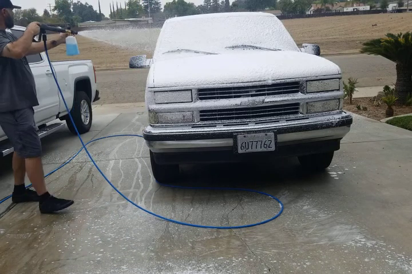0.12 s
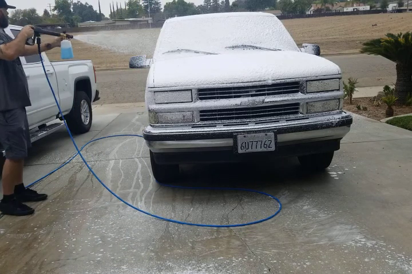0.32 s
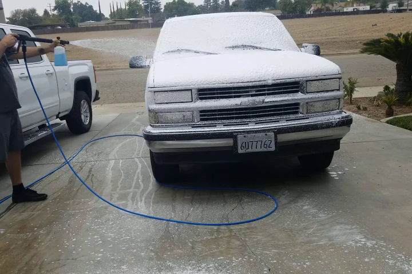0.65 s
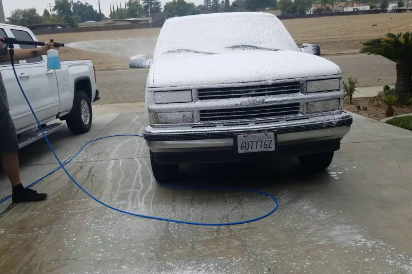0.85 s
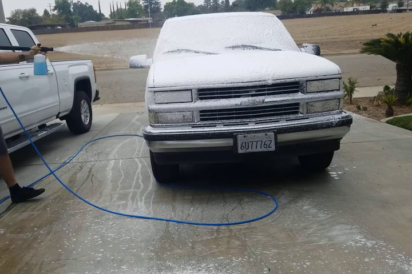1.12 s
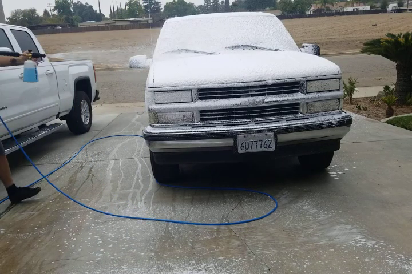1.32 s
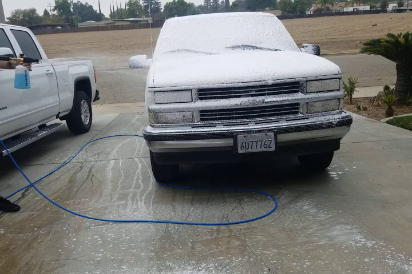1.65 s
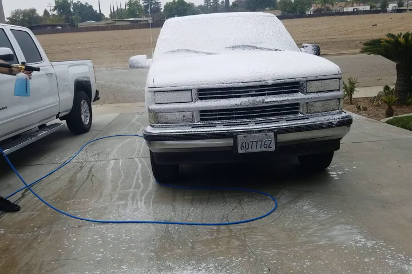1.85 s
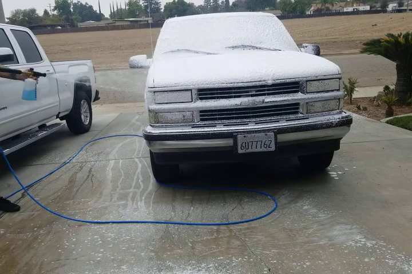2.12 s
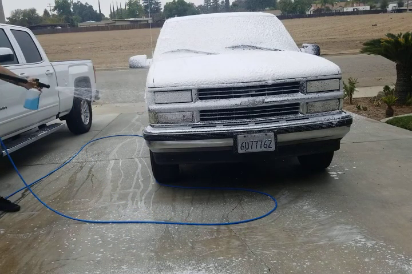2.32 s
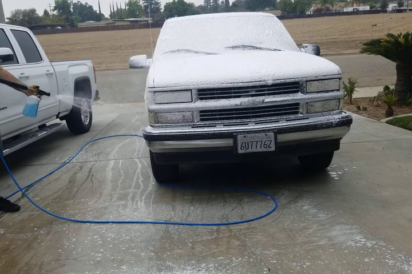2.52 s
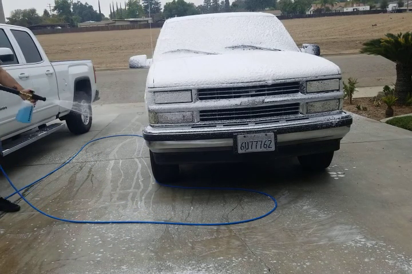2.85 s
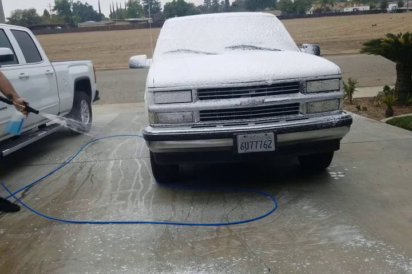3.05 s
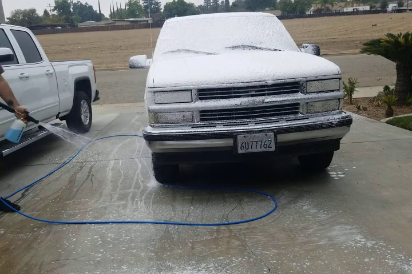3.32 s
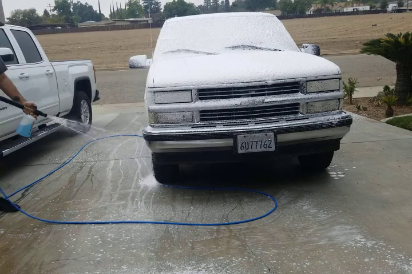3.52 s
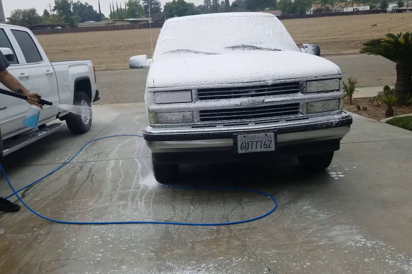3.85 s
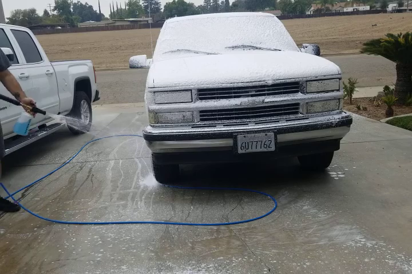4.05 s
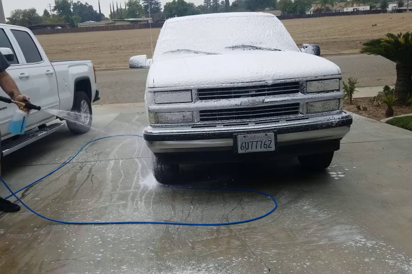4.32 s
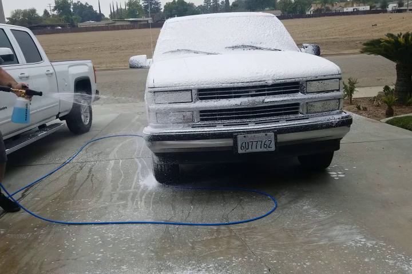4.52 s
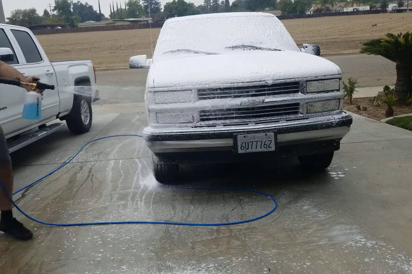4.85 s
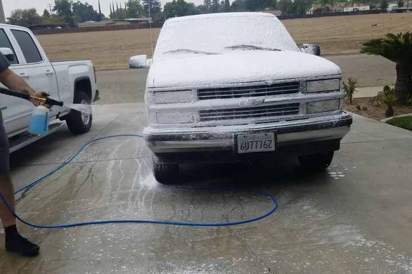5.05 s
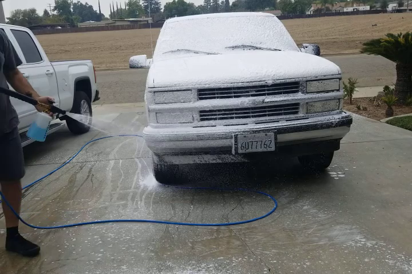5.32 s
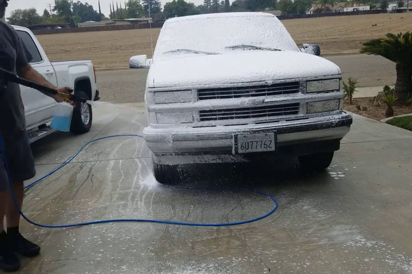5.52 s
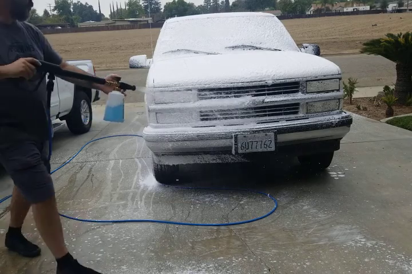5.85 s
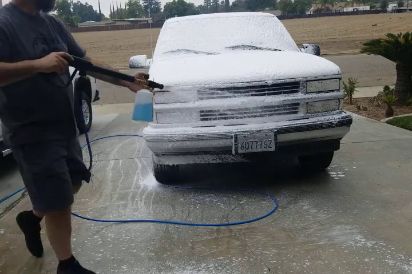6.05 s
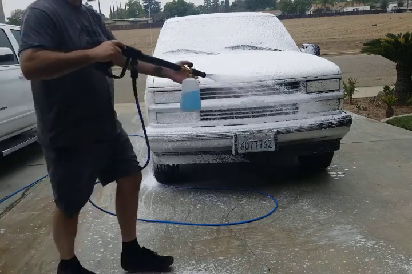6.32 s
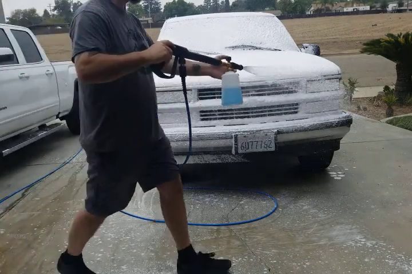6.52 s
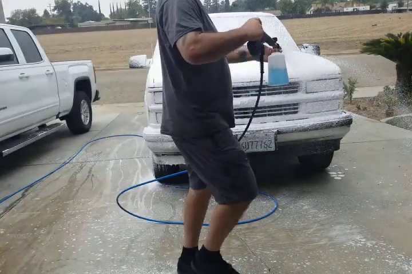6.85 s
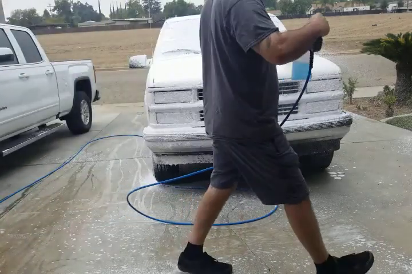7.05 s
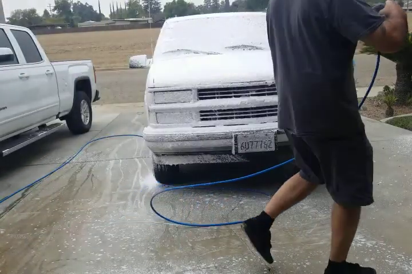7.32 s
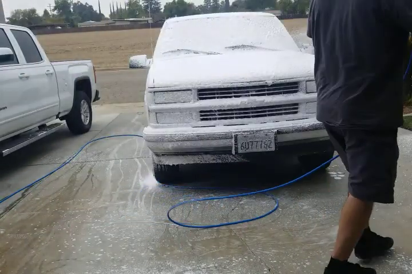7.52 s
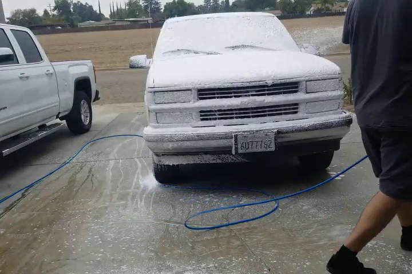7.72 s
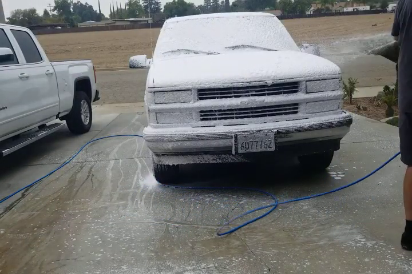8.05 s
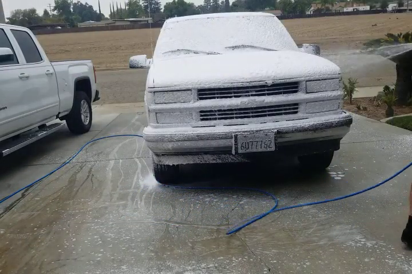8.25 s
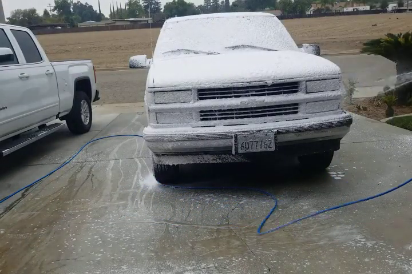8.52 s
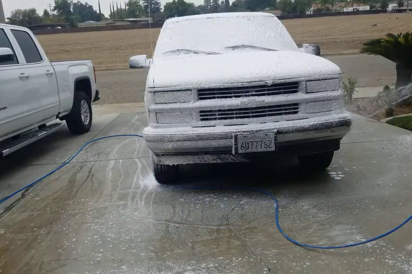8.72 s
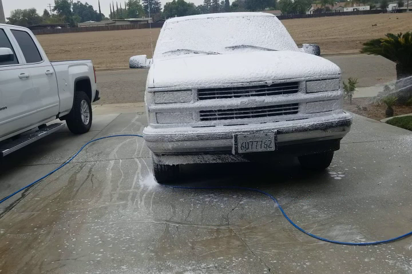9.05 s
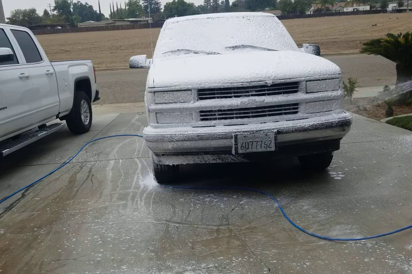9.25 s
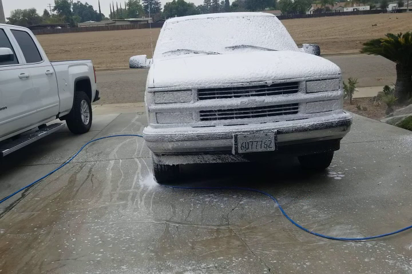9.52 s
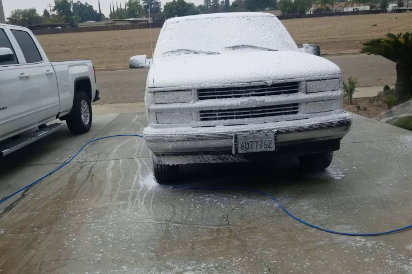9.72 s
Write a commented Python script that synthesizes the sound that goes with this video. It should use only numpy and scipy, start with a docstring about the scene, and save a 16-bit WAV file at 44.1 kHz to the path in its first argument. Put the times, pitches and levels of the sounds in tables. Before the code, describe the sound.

Constant mechanical drone of a small electric pump outdoors, with a low hum, rough buzz and high whine. Over it, a breathy, slightly fluttering rasp of air and water accompanies bright sprays that rush up and fall away as someone foams a truck. A brief dull panel thud comes midway, then more swishes and a sharp bright burst late on. The microphone stands still on the driveway, with an identical, centred sound on both sides.

```python
"""On a driveway an electric pressure washer hums: its motor turns a piston pump through a whining gear pair.
The machine is a sum of tones locked to the pump shaft, with coloured noise for its air and bearings.
A foam cannon rasps, as filtered noise with warbling tones and an echo, while it draws air.
Its fan of spray, noise mixed with tiny impacts, hisses as it sweeps over a truck and the concrete.
Hollow panels boom briefly and faint low drones glide behind; both channels carry the same sound."""
import sys
import numpy as np
from scipy import signal
from scipy.fft import rfft, irfft, next_fast_len
from scipy.io import wavfile
from scipy.ndimage import uniform_filter1d, map_coordinates

SR = 44100
rng = np.random.default_rng(int(sys.argv[2]) if len(sys.argv) > 2 else 0)


def waveform_to_disk(signal):
    """Save audio, clipped to [-1, 1], as 16-bit WAV at the path in sys.argv[1]."""
    frames = np.transpose(np.atleast_2d(signal))
    scaled = np.clip(frames, -1, 1) * 32767
    samples = np.round(scaled).astype(np.int16)
    wavfile.write(sys.argv[1], SR, samples)


N = 435708  # length [samples]


def amp(db):
    """Level to amplitude: 20 dB is a factor of ten."""
    return 10 ** (np.asarray(db) / 20)


def unit(x):
    """Normalisation by the root mean square, to rms 1."""
    return x / np.sqrt(np.mean(x ** 2) + 1e-20)


def curves(rows):
    """Linear interpolation in time: one value per sample for each column after the time."""
    times, *columns = np.transpose(rows)
    return [np.interp(np.arange(N) / SR, times, column) for column in columns]


def wobble(rate):
    """Slow random modulation: a spline through `rate` normal random knots a second."""
    count = int(N * rate / SR) + 4
    fine_knots = np.arange(8 * count - 8) / 8  # eight spline points per knot
    smooth = map_coordinates(rng.standard_normal(count), [fine_knots])
    return np.interp(np.arange(N) * (8 * rate / SR), np.arange(len(smooth)), smooth)


def filtered(x, response):
    """Linear filtering: the spectrum is multiplied by a response of frequency, without phase shift."""
    m = next_fast_len(N + 8192)  # padding keeps the end from wrapping to the start
    return irfft(rfft(x, m) * response(np.fft.rfftfreq(m, 1 / SR)), m)[:N]


def coloured(x, spectrum):
    """Spectral shaping: (frequency [Hz], level [dB]) points joined on a log-frequency axis, at rms 1."""
    f, db = np.transpose(spectrum)

    def response(hz):
        return amp(np.interp(np.log(hz + 1), np.log(f), db))
    return unit(filtered(x, response))


def patchy_noise(patchy_db):
    """Non-stationary noise: white noise with smooth random gain over time and frequency, at rms 1."""
    z = signal.stft(rng.standard_normal(N), nperseg=512)[2]
    field = uniform_filter1d(rng.standard_normal(z.shape), size=3, axis=0)  # smoothed over frequency
    field = uniform_filter1d(field, size=12, axis=1)  # smoothed over time
    patches = z * amp(patchy_db * unit(field))
    return unit(signal.istft(patches, nperseg=512)[1][:N])


def droplets(rate, spread_db):
    """Shot noise: impulses of uneven size at random moments, `rate` a second on average, at rms 1."""
    sizes = rng.uniform(-0.63, 1, N) * amp(spread_db * np.clip(rng.standard_normal(N), -2, 2))
    return unit(sizes * (rng.random(N) < rate / SR))


def tone(angle):
    """Pure tone: a sine of rms 1 that follows an angle [rad] from a random starting phase."""
    turns = angle / (2 * np.pi) + rng.random()
    cycle = (turns - np.floor(turns)).astype(np.float32)
    return np.sqrt(2) * np.sin(2 * np.pi * cycle)


# faint low drones: (start [s], end [s], start frequency [Hz], end frequency [Hz], level at mid-swell [dB])
DRONE_GLIDES = [(.5, 1.8, 138.6, 140.5, -53.5), (2.4, 3.8, 54.4, 61.2, -61), (3.5, 4.5, 62.3, 71, -54),
                (4.5, 5.4, 73.3, 84, -52.5), (5.5, 6.4, 87.4, 94, -55), (6.3, 10, 92.1, 98, -56)]


def drone():
    """Frequency glide: faint, unsteady drones swell and fade, perhaps a distant vehicle changing speed."""
    t, out = np.arange(N) / SR, np.zeros(N)
    for start, end, from_hz, to_hz, db in DRONE_GLIDES:
        part = np.clip((t - start) / (end - start), 0, 1)
        hz = from_hz + (to_hz - from_hz) * part
        angle = 2 * np.pi * np.cumsum(hz) / SR + 0.58 * wobble(12)
        swell = np.sin(np.pi * part)
        out += amp(db + 1.8 * wobble(9.2)) * swell * tone(angle)
    return out


# cooling air and housing noise: (frequency [Hz], relative density [dB per Hz])
HOUSING_AIR = [(25, -30), (45, -23), (95, -1), (140, -4.5), (320, -1.5), (520, 2), (780, 2), (1000, -2.5),
               (1700, -3), (3500, -6), (4600, -11), (6600, -27.5), (15700, -12.5)]
# hiss of teeth and bearings, ringing in the gear case: (frequency [Hz], relative density [dB per Hz])
GEAR_CASE_HISS = [(3000, -7), (4600, -29), (5400, -5.5), (6500, -22), (7300, -5.5), (9300, -15.5),
                  (10400, -9), (11300, -13), (12300, -6), (13200, 1), (14300, -6), (15500, -6.5)]


def fan(shaft, pump_db):
    """Amplitude modulation: housing air and gear hiss throb with the pump; the air is screened a little."""
    throb = 1 + .08 * np.cos(shaft) + .03 * np.cos(2 * shaft)
    air = coloured(patchy_noise(patchy_db=1.4), HOUSING_AIR)
    air = amp(-26.5 + 0.28 * pump_db + 0.17 * wobble(3.26)) * air
    teeth = coloured(patchy_noise(patchy_db=0.7), GEAR_CASE_HISS)
    teeth = amp(-37.5) * (1 + 0.081 * np.cos(shaft)) * teeth
    return throb * (air + teeth)


PINION_TEETH, WHEEL_TEETH = 11, 50
# motor partials: (multiple of the motor shaft, relative level [dB])
MOTOR_PARTIALS = [(1, 0), (2, -20), (3, -18), (4, -22), (5, -16)]
# side tones of the hum: (offset [pump turns a second], relative level [dB])
LOAD_SIDES = [(-1, -9), (1, -14.5), (2, -21.5), (5, -15), (7, -14.5), (8, -20), (10, -18)]


def motor(shaft, level_db):
    """Forced vibration: the rotor shakes the housing and the pump's load swings it, over a mains hum."""
    rotor = shaft * WHEEL_TEETH / PINION_TEETH
    hum = sum(amp(db) * tone(k * rotor) for k, db in MOTOR_PARTIALS)
    sides = sum(amp(db) * tone(rotor + k * shaft) for k, db in LOAD_SIDES)
    mains = tone(2 * np.pi * 120 * np.arange(N) / SR)  # 120 Hz
    return amp(level_db - 0.06) * (hum + sides) + amp(-63.5) * mains


# steady gear tones, before a 0.2 dB lift: (multiple of the tooth rate, level [dB])
MESH_TONES = [(1, -46), (4, -53), (5, -50), (6, -50)]
# two strong gear tones that swell and fade, before the same lift:
# (time [s], 2nd multiple of the tooth rate [dB], 3rd multiple [dB])
STRONG_MESH = [(0.0, -47, -50), (0.22, -51, -46.5), (0.91, -47, -51), (1.21, -52, -50), (2.34, -46.5, -46),
               (2.5, -45, -52), (3.08, -50, -46), (3.27, -47.5, -54), (3.6, -50, -45), (3.8, -44, -51),
               (4.54, -46, -48), (4.9, -47.5, -57), (8.45, -47.5, -52), (8.61, -51, -49), (9.03, -49, -58),
               (9.88, -42.5, -54)]
# side tones of each gear tone: (offset [pump turns a second], level relative to the gear tone [dB])
MESH_SIDES = [(-8, -14.5), (-1, -4.5), (1, -10), (8, -15)]


def gears(shaft):
    """Gear meshing: teeth whine at the tooth rate; the uneven wheel adds drifting side tones."""
    whine = np.zeros(N)
    jitter = 0.082 * wobble(110) + 0.099 * wobble(5.5)  # [rad], multiplied by the order of each tone
    second_db, third_db = curves(STRONG_MESH)
    for k, db in MESH_TONES + [(2, second_db), (3, third_db)]:
        mesh = k * (WHEEL_TEETH * shaft + jitter)
        sides = np.zeros(N)
        for turns, side_db in MESH_SIDES:
            side = tone(mesh + turns * shaft + .5 * wobble(4.6))
            sides += amp(side_db + 2.4 * wobble(4)) * side
        whine += amp(db + 0.2 + 0.55 * wobble(6)) * (tone(mesh) + sides)
    # the side tone just above the tooth rate stands out
    upper_side = tone((WHEEL_TEETH + 1) * shaft + jitter)
    return whine + amp(-48 + 2 * wobble(3)) * upper_side


LOUDEST_ORDER = 19  # multiple of the pump shaft
# piston stroke partials: (multiple of the pump shaft, relative level [dB])
STROKE_PARTIALS = [(1, -18), (2, -11), (3, -10), (4, -34), (5, -1), (6, -28), (7, -19), (8, -9.5), (9, -8),
                   (10, -4.5), (11, -5), (12, -7.5), (13, -15), (14, -13), (15, -3), (16, -7), (17, -9.5),
                   (18, -40.5), (19, 0), (20, -22), (21, -12.5), (22, -18), (23, -9.5), (24, -5.5),
                   (25, -24), (26, -3.5), (27, -14), (28, -15), (29, -10), (30, -12), (31, -11.5),
                   (32, -15), (33, -6.5), (34, -13.5), (35, -6.5), (36, -19)]


def pump(shaft, level_db):
    """Harmonic series: the piston strokes repeat with every turn, and each partial wavers by itself."""
    body = np.zeros(N)
    for k, db in STROKE_PARTIALS:
        if k != LOUDEST_ORDER:
            partial = tone(k * shaft + 0.052 * wobble(14))
            body += amp(db + 1.46 * wobble(2.99)) * partial
    loudest = amp(level_db + 0.2 + 0.35 * wobble(11)) * tone(LOUDEST_ORDER * shaft)
    # the many weaker partials are screened only half as much as the loudest one
    return amp(-24.5 + .5 * level_db) * body + loudest


# air drawn through the foam cannon: (frequency [Hz], relative density [dB per Hz])
INLET_AIR = [(1200, -21), (1700, -18.5), (1950, -2), (2150, 1.5), (2450, 0), (2750, -2), (2950, -2),
             (3200, -19), (4200, -35)]
# unsteady whistles in the air inlet: (centre [Hz], wander scale [Hz], relative level [dB])
INLET_WHISTLES = [(2222, 150, -12.5), (2703, 200, -15)]
# the rasp, before a 0.4 dB cut: (time [s], level [dB])
RASP_LEVEL = [(0.0, -37), (0.6, -37), (1.21, -34), (5.47, -34), (5.58, -31.5), (6.88, -33.5), (8.03, -38.5),
              (8.61, -34), (9.24, -35.5), (9.35, -40.5), (9.6, -34), (9.88, -35.5)]
ECHO_MS, SWAY_MS, SWAYS_PER_S = 2.265, 0.067, 2.5  # echo delay, scale of its shift, random knots a second


def nozzle(shaft):
    """Comb filtering: the rasp of gulped air meets its echo off the concrete, which shifts as the gun sways."""
    rasp = coloured(patchy_noise(patchy_db=1.77), INLET_AIR)
    for centre_hz, wander_hz, db in INLET_WHISTLES:
        angle = 2 * np.pi * np.cumsum(centre_hz + wander_hz * wobble(90)) / SR
        rasp = rasp + amp(db) * wobble(120) * tone(angle)
    delay = (ECHO_MS + SWAY_MS * wobble(SWAYS_PER_S)) * SR / 1000  # [samples]
    echo = np.interp(np.arange(N) - delay, np.arange(N), rasp)
    sputter = amp(0.27 * wobble(35)) * (1 + 0.021 * np.cos(shaft))
    return amp(curves(RASP_LEVEL)[0] - 0.4) * unit((rasp + 0.15 * echo) * sputter)


# the jet drums on hollow panels:
# (time of peak [s], Gaussian half length [s], resonance [Hz], peak level [dB])
PANEL_BOOMS = [(4.39, 0.028, 283, -39.5), (4.44, .03, 415, -44), (4.458, 0.032, 139, -49)]


def panel():
    """Resonance: noise in a narrow band booms, swelling and fading as the jet crosses a hollow panel."""
    t, out = np.arange(N) / SR, np.zeros(N)
    for s, half_s, ring_hz, db in PANEL_BOOMS:
        noise = rng.standard_normal(N)
        boom = unit(filtered(noise, lambda hz: 1 / (1 + ((hz - ring_hz) / 35) ** 2)))
        out += amp(db) * np.exp(-.5 * ((t - s) / half_s) ** 2) * boom
    return out


# the fan of spray swings towards the listener and away again:
# (time of peak [s], hiss level [dB], splash level [dB], rise [s], fall [s],
#  flank shape [1 a pointed peak, 2 a round bell])
SPRAY_SWEEPS = [(.82, -33, -41, 0.048, .6, 1.6), (1.89, -24, -35.5, 0.22, .2, 1.17),
                (3.14, -24.5, -36.5, 0.32, 0.21, 1.06), (3.75, -34, -40.5, 0.96, 0.84, 1.7),
                (4.18, -27, -36.5, .06, .1, 1.4), (4.43, -18.5, -34, .13, 0.13, 1.6),
                (4.68, -26.5, -36, 0.19, 0.37, 1.2), (5.36, -19.5, -32.5, 0.17, 0.51, 1.18),
                (6.27, -27.5, -34, 0.22, 0.21, 1.1), (6.9, -24.3, -34.5, 0.16, .17, 1.5),
                (7.45, -36.5, -47.5, 0.58, 0.67, 1.3), (8.64, -18, -33, 0.15, 0.19, 1.6),
                (8.94, -29, -40, .07, .2, 1), (9.38, -35.5, -43.5, 0.23, 0.42, 1.3),
                (9.71, -27.5, -40, 0.058, .4, 1.3)]


def sweeps(peaks_db, away_db, wider):
    """Energy summation: the power of every sweep adds to that of the steady spray; gives a level in dB."""
    t = np.arange(N) / SR
    power = np.full(N, amp(away_db) ** 2)
    for (s, _, _, rise, fall, shape), db in zip(SPRAY_SWEEPS, peaks_db):
        off_aim = np.abs(t - s) / (wider * np.where(t < s, rise, fall))
        power += amp(db) ** 2 * np.exp(-2 * np.minimum(off_aim, 10) ** shape)
    return 10 * np.log10(power)


# the fan of spray: (frequency [Hz], relative density [dB per Hz])
MIST_HISS = [(3000, -30), (7000, -10), (7800, -22), (8500, -9.5), (9300, -0.5), (10500, 0), (11200, -4),
             (12000, 1), (13000, 2), (14200, -4.5), (15200, -4), (15700, -28)]
# foam landing on paint and concrete: (frequency [Hz], relative density [dB per Hz])
FOAM_SPLASH = [(200, -30), (600, -18), (1500, -6.5), (3300, 3.5), (4600, 1), (6000, 1), (7200, -2),
               (7700, -5), (9000, 1), (15000, -29)]
AWAY_HISS_DB, AWAY_SPLASH_DB = -45, -46.5  # the spray while it points away
SPLASH_WIDER = 1.54  # the splash swells and fades this many times more slowly than the hiss
# a louder sweep is brighter: treble edge, treble growth per dB, hiss level at which it is neutral
BRIGHT_HZ, BRIGHT_DB_PER_DB, BRIGHT_FROM_DB = 12500, 0.04, -37


def spray(shaft):
    """Turbulence and impact noise: mist hisses, droplets patter, both pulsing slightly with the pressure."""
    _, hiss_peaks, splash_peaks, *_ = np.transpose(SPRAY_SWEEPS)
    hiss_db = sweeps(hiss_peaks, AWAY_HISS_DB, wider=1)
    splash_db = sweeps(splash_peaks, AWAY_SPLASH_DB, wider=SPLASH_WIDER)
    pressure = 1 + 0.028 * np.cos(shaft) + 0.024 * np.cos(2 * shaft)
    jet = patchy_noise(patchy_db=1.0) + 0.42 * droplets(rate=3400, spread_db=5)
    mist = coloured(jet, MIST_HISS)
    treble = filtered(mist, lambda hz: 1 - 1 / (1 + (hz / BRIGHT_HZ) ** 8))
    mist = mist - treble + amp(BRIGHT_DB_PER_DB * (hiss_db - BRIGHT_FROM_DB)) * treble
    landing = patchy_noise(patchy_db=1.64) + 0.33 * droplets(rate=700, spread_db=3.0)
    patter = coloured(landing, FOAM_SPLASH)
    hiss = amp(hiss_db + 0.55 * wobble(18)) * mist
    splash = amp(splash_db + 0.6 * wobble(14)) * patter
    return pressure * (hiss + splash)


# the shaft starts CREEP_HZ below its steady speed and approaches it with this time constant
SETTLED_HZ, CREEP_HZ, SETTLE_S = 52.53, .23, 3.5
# how well the machine is heard as it is screened and uncovered:
# (time [s], motor hum control level [dB], pump control level [dB])
SCREENING = [(0.0, -42, -45), (0.25, -41, -44.5), (2.36, -41, -43.5), (5.64, -42, -47), (5.81, -44, -46.5),
             (6.22, -42.5, -48), (7.81, -40, -45), (9.85, -43, -50), (9.88, -41.5, -48)]


def scene():
    """Superposition: all sources add, and one pump shaft paces both the machine and the jet."""
    speed_hz = SETTLED_HZ - CREEP_HZ * np.exp(-np.arange(N) / SR / SETTLE_S)
    shaft = 2 * np.pi * np.cumsum(speed_hz) / SR  # angle [rad]
    hum_db, pump_db = curves(SCREENING)
    washer = fan(shaft, pump_db) + motor(shaft, hum_db) + gears(shaft) + pump(shaft, pump_db)
    foam = nozzle(shaft) + panel() + spray(shaft)
    return np.tile(drone() + washer + foam, (2, 1))


TOP_HZ = 15750


def record(dry):
    """Band limiting: an ideal low-pass keeps only what lies below TOP_HZ."""
    return np.array([filtered(channel, lambda hz: hz < TOP_HZ) for channel in dry])


dry = scene()
out = record(dry)
waveform_to_disk(out)
```